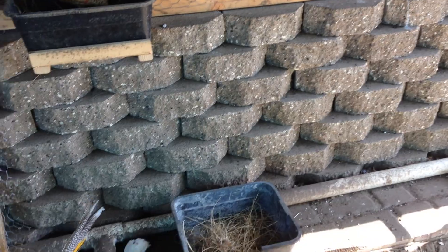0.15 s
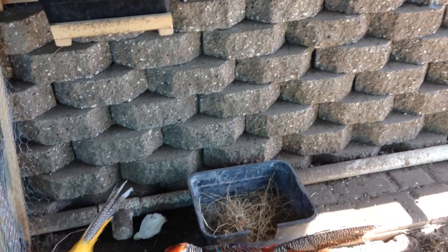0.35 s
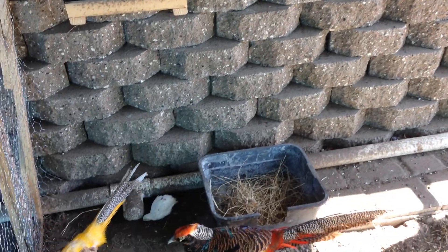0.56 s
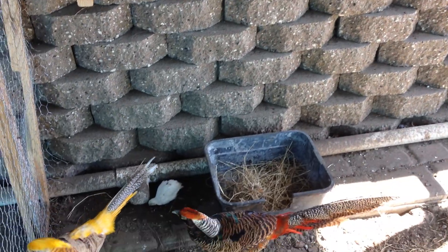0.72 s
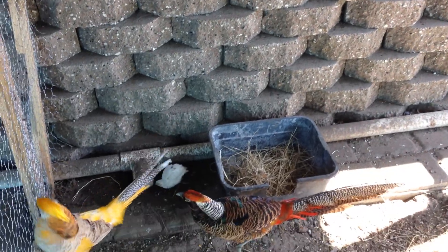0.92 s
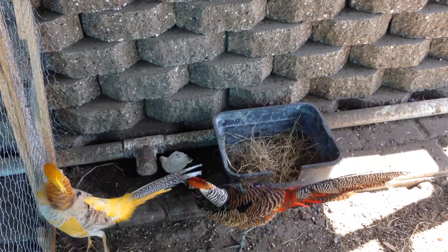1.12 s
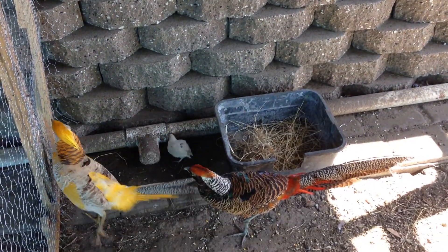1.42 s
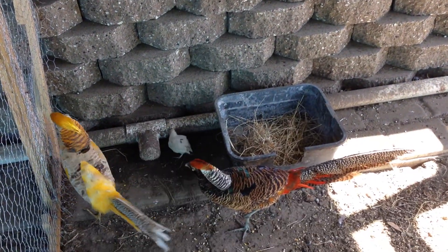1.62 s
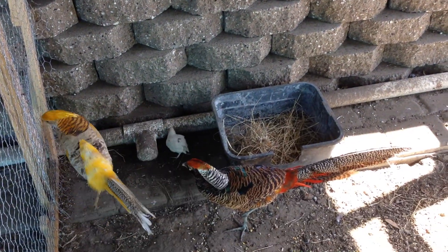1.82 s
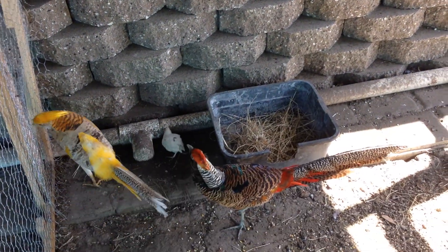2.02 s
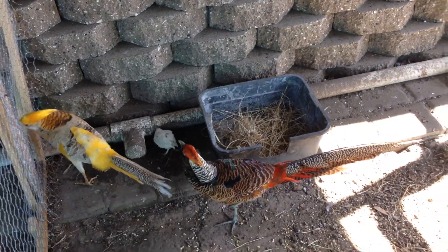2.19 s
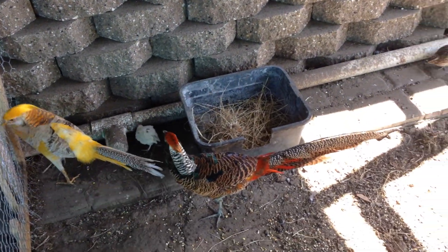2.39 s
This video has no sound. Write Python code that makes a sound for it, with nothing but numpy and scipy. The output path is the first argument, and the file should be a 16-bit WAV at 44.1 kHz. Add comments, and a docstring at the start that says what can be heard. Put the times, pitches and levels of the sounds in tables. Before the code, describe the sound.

A pheasant crows harshly in three shrill, rasping bursts during the first second and a half, then soft low clucks and faint scratching in litter follow, with close echoes from a block wall and quiet outdoor air.

```python
"""An outdoor pen with a block wall, where a fowl gives a harsh three-part crow.
The crow crossfades two harmonic voices; its shrill note keeps breaking into a rasp of pulsed noise
through throat resonances, and a thin whistle joins near its end. Other birds cluck in short falling
tones and scratch in the litter in noise bursts. Ground and wall throw these sounds back,
over a low wavering hum and faint outdoor air of shaped noise."""
import sys
import numpy as np
from scipy import signal
from scipy.fft import rfft, irfft
from scipy.io import wavfile
from scipy.ndimage import uniform_filter1d

SR = 44100
rng = np.random.default_rng(int(sys.argv[2]) if len(sys.argv) > 2 else 0)


def waveform_to_disk(signal):
    """Save audio, clipped to [-1, 1], as 16-bit WAV at the path in sys.argv[1]."""
    frames = np.transpose(np.atleast_2d(signal))
    scaled = np.clip(frames, -1, 1) * 32767
    samples = np.round(scaled).astype(np.int16)
    wavfile.write(sys.argv[1], SR, samples)


N = 112454
TIME = np.arange(N) / SR  # s
# pitch jitter of the crow and its whistle: spread as a share of the pitch, and bandwidth in Hz
JITTER, JITTER_HZ = .004, 297


def from_db(db):
    """Decibels to gain."""
    return 10 ** (np.asarray(db) / 20)


def rms_one(x):
    """Scale to unit power."""
    return x / np.sqrt(np.mean(x ** 2) + 1e-20)


def in_time(rows):
    """Draw each column of a breakpoint curve at every sample."""
    s, *columns = np.transpose(rows)
    return [np.interp(TIME, s, column) for column in columns]


def at_hz(points, hz):
    """Read a spectrum in dB on a log-frequency axis."""
    f, db = np.transpose(points)
    return np.interp(np.log(hz + 1e-9), np.log(f), db)


def running_phase(hz):
    """Add up a moving frequency into a phase in radians."""
    return 2 * np.pi * np.cumsum(hz) / SR


def drift(rate):
    """Random wander with spread 1: noise through a two-pole low-pass at rate Hz."""
    r = np.exp(-2 * np.pi * rate / SR)
    noise = rng.standard_normal(N + SR)
    settled = signal.lfilter([1], [1, -2 * r, r * r], noise)[SR:]
    return rms_one(settled)


def band(x, low, high, order=2):
    """Butterworth band-pass."""
    edges = [low, min(high, SR / 2 - 1000)]
    sos = signal.butter(order, edges, "band", fs=SR, output="sos")
    return signal.sosfilt(sos, x + 1e-18)


def resonate(x, hz, width):
    """One resonance with gain 1 on top; a wider one rings for less time."""
    r = np.exp(-np.pi * width / SR)
    zeros = np.array([1, 0, -1]) * (1 - r * r) / 2
    poles = [1, -2 * r * np.cos(2 * np.pi * hz / SR), r * r]
    return signal.lfilter(zeros, poles, x)


def even(x, size=900):
    """Hold the short-term level at 1 over a window of size samples."""
    return x / np.sqrt(np.abs(uniform_filter1d(x * x, size)) + 1e-12)


def outdoor_air():
    """Steady noise whose spectrum is mostly low."""
    # relative spectrum of the air: f/Hz, level/dB per Hz
    air_spectrum = [(15, -57), (25, -28), (54, -3.5), (86, -6), (118, -3), (202, -4), (231, -3.5),
                    (264, -1.5), (427, -7.5), (621, -8), (749, -7.5), (1000, -11.5), (1810, -8.5),
                    (2300, -10.5), (2950, -14.5), (4040, -14), (15000, -32)]
    gain = from_db(at_hz(air_spectrum, np.fft.rfftfreq(N, 1 / SR)))
    air = irfft(rfft(rng.standard_normal(N)) * gain, N)
    return from_db(-52) * rms_one(air)


def low_hum():
    """A low tone that swells and fades, with weaker steady tones above; all waver in phase."""
    # level of the lowest tone: t/s, level/dB
    hum_level = [(0.0, -63), (0.04, -72), (0.29, -54.5), (0.51, -72), (0.62, -57), (0.85, -54), (1.04, -87),
                 (1.16, -54.5), (1.46, -66), (1.74, -54.5), (1.89, -63), (1.92, -72), (2.14, -53),
                 (2.55, -72)]
    # weaker tones above it: f/Hz, level/dB
    upper_tones = [(164.8, -63), (240, -63.5)]
    hum_hz = 119.2
    hum_db, = in_time(hum_level)
    out = np.zeros(N)
    for hz, db in [(hum_hz, hum_db)] + upper_tones:
        waver = hz / hum_hz * .5 * drift(10.6)  # radians
        out += from_db(db) * rms_one(np.sin(2 * np.pi * hz * TIME + waver))
    return out


def pen(x):
    """Close echoes off the ground and the block wall, then a faint diffuse tail that dies away."""
    # ground and wall: delay/s, level/dB
    echoes = [(.0031, -32), (.0074, -14.5), (0.0129, -10.5)]
    t60_s, tail_db = .29, -10
    early = sum(from_db(db) * np.interp(TIME - delay, TIME, x) for delay, db in echoes)
    age = TIME[:SR]
    diffuse = band(rng.standard_normal(SR), 120, 4250, order=1)
    tail = diffuse * from_db(-60 * age / t60_s) * (age > .005)
    tail = tail / np.linalg.norm(tail)
    return x + early + from_db(tail_db) * signal.fftconvolve(x, tail)[:N]


def scratches():
    """Feet in the litter: gritty band noise with a quick rise and an exponential decay."""
    # rustles: t/s, decay time constant/s, level/dB, centre f/Hz
    rustles = [(.115, 0.0039, -65, 1500), (1.372, 0.027, -49.5, 5740), (1.485, 0.01, -59, 4450),
               (1.625, 0.009, -50, 2005), (1.69, 0.011, -51, 2800), (2.02, 0.059, -53.5, 1680),
               (2.115, 0.046, -57.5, 3730), (2.42, 0.071, -60.5, 2970), (2.446, 0.0078, -54, 800)]
    attack_share = 0.22  # rise time as a share of the decay
    out = np.zeros(N)
    for start, decay, db, hz in rustles:
        age = np.maximum(TIME - start, 0)
        uneven = rng.standard_normal(N) * from_db(3 * drift(300))
        grit = rms_one(band(uneven, hz / 2, hz * 2))
        envelope = np.minimum(age / (attack_share * decay), 1) * np.exp(-age / decay)
        out += from_db(db) * envelope * grit
    return out


def clucks():
    """Short, low, husky notes that swell and fade as their wavering pitch falls."""
    # soft clucks: t/s, length/s, mid pitch f/Hz, level/dB
    cluck_notes = [(0.957, 0.023, 606, -50), (0.976, 0.032, 566, -48.5), (1.002, 0.011, 378.7, -44.5),
                   (1.113, 0.041, 686, -46), (1.119, 0.015, 411, -51.5), (1.331, 0.034, 819, -45.5),
                   (1.34, 0.011, 434, -46), (1.677, 0.019, 540.6, -45.5), (1.79, 0.021, 758, -48.5),
                   (1.801, 0.029, 427, -46.5), (1.961, 0.03, 372.5, -47.5)]
    waver, fall = .05, .1  # shares of the pitch
    overtone_db, husk_db = -16, -7
    out = np.zeros(N)
    for start, length, hz, db in cluck_notes:
        along = np.clip((TIME - start) / length, 0, 1)
        phase = running_phase(hz * (1 + fall * (.5 - along) + waver * drift(141)))
        note = rms_one(np.sin(phase) + from_db(overtone_db) * np.sin(2 * phase))
        breath = band(rng.standard_normal(N), hz * 0.56, hz * 3.04)
        husk = from_db(husk_db) * rms_one(breath)
        out += from_db(db) * np.sin(np.pi * along) * (note + husk)
    return out


def whistle():
    """A thin, jittery sine near 5 kHz that glides down as the crow ends."""
    # path of the whistle: t/s, f/Hz, level/dB
    glide = [(1.265, 5040, -62), (1.29, 5180, -60), (1.33, 5070, -58), (1.365, 5000, -68),
             (1.39, 4850, -48), (1.41, 4700, -73)]
    hz, db = in_time(glide)
    phase = running_phase(hz * (1 + JITTER * drift(JITTER_HZ)))
    sounding = (TIME > glide[0][0]) * (TIME < glide[-1][0])
    return from_db(db) * rms_one(np.sin(phase)) * sounding


def voice(pitch, rough, tone):
    """Twelve harmonics of a note whose pitch jitters more as it roughens; also gives its phase."""
    rough_jitter = .017  # extra jitter at full roughness, as a share of the pitch
    phase = running_phase(pitch * (1 + (JITTER + rough_jitter * rough) * drift(JITTER_HZ)))
    note = sum(from_db(at_hz(tone, k * pitch)) * np.sin(k * phase) for k in range(1, 13))
    return note, phase


def rasp(phase, resonances):
    """Noise puffed once per cycle of the upper voice, coloured by the throat resonances."""
    puffs = rng.standard_normal(N) * (1 + np.cos(phase))
    throat = np.zeros(N)
    for k, (hz, width, db) in enumerate(resonances):
        wide = 1.87 * width  # each resonance is passed twice, which narrows it
        ring = resonate(resonate(puffs, hz, wide), hz, wide)
        throat += (-1) ** k * from_db(db) * ring  # neighbours in opposite polarity
    return even(throat)


def crow_part(gesture, resonances, *levels):
    """Two voices trade strength; with roughness, rasp replaces the note and the main band throbs."""
    # strength of the upper voice's harmonics, relative: f/Hz, level/dB
    upper_tone = [(1110, -8.5), (1190, -3), (1400, -7), (2300, 7), (2780, -11), (3050, -48), (3480, -2),
                  (3800, -22), (4300, -50), (4650, -18.5), (4850, -3), (5500, -16), (6200, -34),
                  (7600, -30.5), (10000, -44), (11300, -40), (14000, -47)]
    # pitch of the lower voice: t/s, f/Hz
    lower_pitch = [(.22, 903), (.26, 1030), (.34, 1008), (.362, 926.4), (.42, 920), (.5, 1033), (.86, 996),
                   (1.28, 951), (1.405, 989), (1.5, 927)]
    # strength of the lower voice's harmonics, relative: f/Hz, level/dB
    lower_tone = [(1000, 2.5), (1840, 2), (1960, -8), (2060, 0.5), (3700, -23), (4630, -18.5),
                  (5550, -15.5), (6500, -22.5), (12000, -49)]
    rasp_db = 2  # at full roughness
    flutter_hz, flutter_wander, flutter_depth = 112, .25, 1.1  # wander is a share of the rate

    pitch, rough, share = in_time(gesture)
    rough, share = np.clip(rough, 0, 1), np.clip(share, 0, 1)
    upper, phase = voice(pitch, rough, upper_tone)
    lower, _ = voice(in_time(lower_pitch)[0], rough, lower_tone)
    note = np.sqrt(1 - share ** 2) * even(upper) + share * even(lower)
    cry = np.sqrt(1 - rough ** 2) * note + from_db(rasp_db) * rough * rasp(phase, resonances)

    # each band is evened out, then follows its own level curve
    edges = [(1600, 2850), (850, 1500), (3250, 5600), (6200, 15500)]  # main, low, treble, top in Hz
    bands = []
    for level, (low, high) in zip(levels, edges):
        gain = from_db(in_time(level)[0])
        bands.append(gain * even(band(cry, low, high, order=6)))
    main, *others = bands

    flutter = np.sin(running_phase(flutter_hz * (1 + flutter_wander * drift(39.5))))
    throb = 1 + np.minimum(flutter_depth * rough, .5) * flutter
    start, end = levels[0][0][0], levels[0][-1][0]
    fade = np.interp(TIME, [start, start + 0.0023, end - .03, end], [0, 1, 1, 0])
    return (main * throb + sum(others)) * fade


def crow():
    """The three parts of the crow, each with its own throat shape and four band levels."""
    # voices in each part: t/s, upper voice f/Hz, roughness [0-1], share of the lower voice [0-1]
    gestures = [
        [(.22, 1220, 0.69, 1), (.258, 1224, 0.83, 0.97), (.275, 1159, 0.32, 0.27), (.3, 1162, 0.34, 0),
         (.33, 1174, 0.65, 0.5), (.36, 1158, 0.32, 0.65), (.385, 1184, 0.32, 1)],
        [(.48, 1217, 0.92, .5), (.5, 1248, 0.74, 0.75), (.514, 1377, 0.3, 0.1), (.545, 1392, 0.53, 0.06),
         (.572, 1343, 0.62, 0), (.59, 1228, 0.18, 0.01), (.612, 1203, 0.24, 0.24), (.65, 1246, 0.12, 0),
         (.68, 1262, 0.46, 0.02), (.735, 1281, 0.48, 0), (.76, 1248, .15, .05), (.79, 1229, 0.66, 0.01),
         (.82, 1189, 0.82, 0.23)],
        [(1.108, 1187, 0.42, 0.94), (1.124, 1193, 0.14, 0), (1.165, 1196, 0.08, 0.15), (1.2, 1261, .45, 0),
         (1.25, 1240, 0.71, 0), (1.3, 1196, 0.54, 0.06), (1.36, 1154, 0.4, 0.12), (1.392, 1129, 0.18, 0.06),
         (1.41, 1125, 0.25, 0.73), (1.47, 1125, 0.31, .55)],
    ]
    # throat resonances in each part: f/Hz, width/Hz before widening, relative level/dB
    throats = [
        [(1030, 72, 9.5), (2080, 700, -4), (2405, 250, -2.5), (3590, 85, -5), (3900, 1100, -23),
         (5130, 210, -11.5), (7960, 570, -33), (9100, 400, -26), (10600, 700, -31)],
        [(1081, 77, -7.5), (1194, 370, -13), (2012, 76, -2), (2389, 40, 4.5), (2710, 94, -11), (3374, 93, -1),
         (3750, 200, -15.5), (4980, 510, -10), (5550, 85, -7.5), (7450, 450, -25), (8700, 330, -37),
         (9800, 400, -46), (11350, 500, -37)],
        [(933.5, 190, -7.5), (1130, 300, -19), (1540, 51, -2.5), (1890, 30, 5), (2228, 39, 6.5),
         (2540, 430, -8), (3280, 210, -3), (3700, 690, -11.5), (4920, 170, -5), (5350, 110, -9.5),
         (9000, 420, -34), (10400, 700, -34)],
    ]
    # level of the main band in each part, before the throb: t/s, level/dB
    main_levels = [
        [(0.21, -62), (0.234, -42), (0.26, -34), (0.3, -30.5), (0.388, -35), (0.43, -64)],
        [(0.478, -46), (0.484, -44.5), (0.51, -29.5), (0.568, -41), (0.598, -25), (0.628, -55), (0.638, -27.5),
         (0.692, -33), (0.706, -46), (0.714, -30.5), (0.746, -41.5), (0.758, -22.5), (0.79, -39),
         (0.794, -33.5), (0.886, -39), (0.89, -48)],
        [(1.05, -50), (1.118, -35.5), (1.126, -25), (1.16, -32), (1.196, -33), (1.206, -57), (1.226, -38.5),
         (1.298, -31), (1.342, -34.5), (1.352, -48.5), (1.392, -22), (1.406, -47), (1.418, -37.5), (1.434, -47),
         (1.462, -40.5), (1.58, -59)],
    ]
    # level of the band round the fundamental in each part: t/s, level/dB
    low_levels = [
        [(0.21, -68), (0.226, -53.5), (0.258, -38.5), (0.274, -47.5), (0.306, -49.5), (0.348, -38),
         (0.382, -66), (0.392, -58), (0.408, -69), (0.42, -39.5)],
        [(0.478, -59), (0.488, -40.5), (0.534, -35), (0.676, -48), (0.704, -33.5), (0.748, -47.5),
         (0.764, -31.5), (0.778, -70), (0.812, -39), (0.88, -50.5)],
        [(1.05, -106), (1.09, -43.5), (1.138, -38), (1.205, -46), (1.264, -54), (1.28, -39), (1.388, -43),
         (1.422, -29.5), (1.462, -61), (1.498, -44), (1.53, -73)],
    ]
    # level of the treble in each part: t/s, level/dB
    treble_levels = [
        [(0.21, -56), (0.252, -44), (0.27, -47), (0.302, -34), (0.316, -45.5), (0.364, -40.5), (0.42, -53.5)],
        [(0.478, -50), (0.504, -41.5), (0.62, -42.5), (0.632, -60), (0.64, -44), (0.83, -43.5), (0.88, -47.5)],
        [(1.05, -63), (1.108, -43.5), (1.336, -50.5), (1.366, -44.5), (1.476, -64), (1.484, -50.5), (1.53, -68)],
    ]
    # level above 6 kHz in each part: t/s, level/dB
    top_levels = [
        [(.21, -66), (.25, -59), (.37, -60), (.42, -65)],
        [(.478, -66), (.52, -52), (.61, -55.5), (.67, -54), (.81, -53), (.88, -65)],
        [(1.05, -71), (1.13, -61), (1.33, -60), (1.45, -72)],
    ]
    parts = zip(gestures, throats, main_levels, low_levels, treble_levels, top_levels)
    return sum(crow_part(*part) for part in parts)


def scene():
    """The birds echo in their pen, over the air and the hum."""
    birds = scratches() + clucks() + whistle() + crow()
    mix = outdoor_air() + low_hum() + pen(birds)
    return mix[None]


def record(dry):
    """A steep elliptic low-pass cuts the top."""
    cutoff_hz = 15400
    sos = signal.ellip(12, .1, 80, cutoff_hz, fs=SR, output="sos")
    return signal.sosfilt(sos, dry)


dry = scene()
out = record(dry)
waveform_to_disk(out)
```